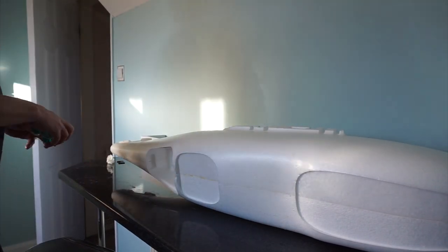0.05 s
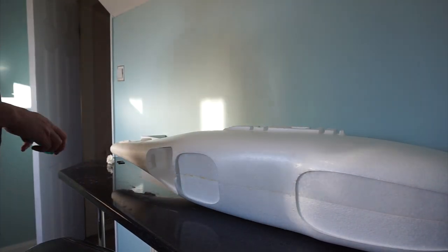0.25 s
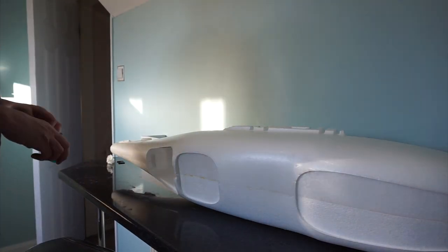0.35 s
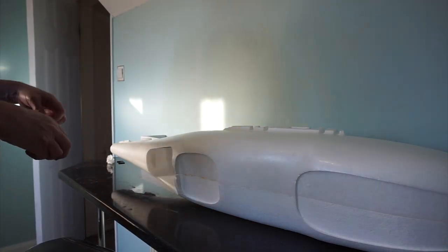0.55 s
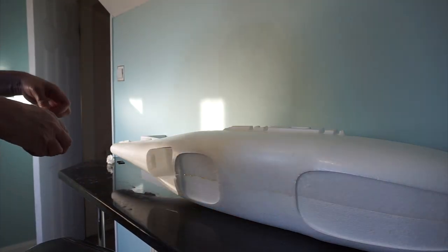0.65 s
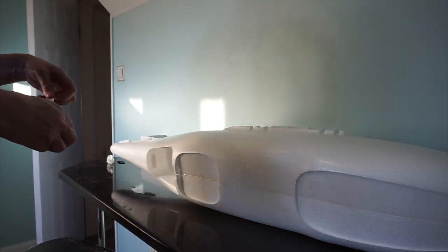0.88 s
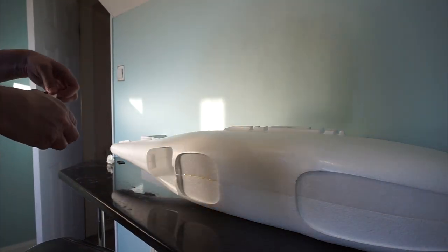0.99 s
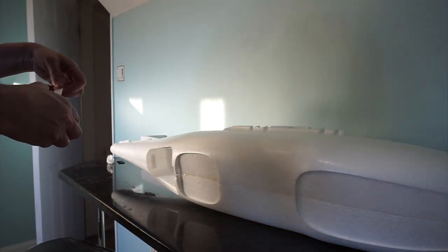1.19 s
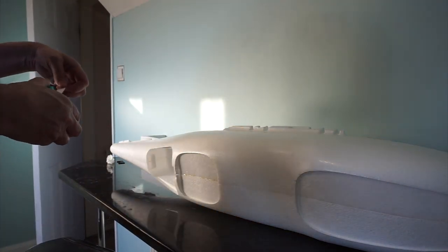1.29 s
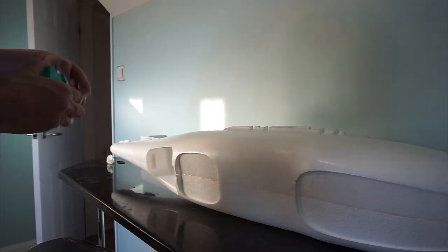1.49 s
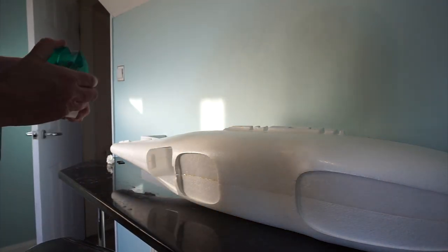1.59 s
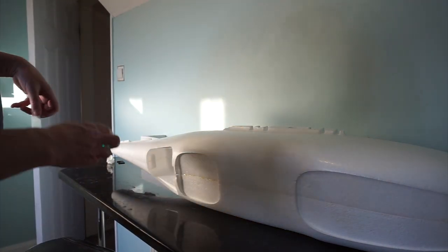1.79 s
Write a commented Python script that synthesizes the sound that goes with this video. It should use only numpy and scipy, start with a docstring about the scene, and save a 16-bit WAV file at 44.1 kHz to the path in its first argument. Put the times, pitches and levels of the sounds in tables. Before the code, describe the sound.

A long crackling rasp of sticky tape peeling from its roll, then a quick rip in an echoing room.

```python
"""Tape ripped off a roll

Adhesive tape is pulled off a roll, left of a small camera, in a bare echoing room: a long rasping pull and a
short rip made of dense random clicks, tacks of glue that are each a single placed click with a brief ring,
and soft rustles of noise. Filtered noise makes the low rumble and a wavering drone; filtered clicks make
the camera's ticking drive. The gain turns down when the tape is loud and creeps back up afterwards."""
import sys
import numpy as np
from scipy import signal
from scipy.fft import rfft, irfft, next_fast_len
from scipy.io import wavfile

SR = 44100
rng = np.random.default_rng(int(sys.argv[2]) if len(sys.argv) > 2 else 0)


def volts_from_db(level):
    """Convert decibel levels to linear amplitude ratios."""
    exponent = np.asarray(level, float) / 20
    return 10 ** exponent


def waveform_to_disk(signal):
    """Save audio, clipped to [-1, 1], as 16-bit WAV at the path in sys.argv[1]."""
    frames = np.transpose(np.atleast_2d(signal))
    scaled = np.clip(frames, -1, 1) * 32767
    samples = np.round(scaled).astype(np.int16)
    wavfile.write(sys.argv[1], SR, samples)


N = 81585  # length in samples

# Colour of the crackling glue, before any filters: pitch_hz [Hz], level_db [dB per Hz, relative]
GLUE_COLOUR = [(150, -66.5), (300, -30), (544, -18), (1100, -11.5), (2210, 0), (3190, -3), (4330, -3),
               (6000, -2), (8000, -6), (10000, -0.5), (12500, -10)]


def rms_one(x):
    """Scale to an average strength (rms) of 1."""
    return x / np.sqrt(np.mean(x ** 2) + 1e-20)


def at_hz(points, hz):
    """Read a table of values against pitch, on a log pitch axis."""
    table_hz, values = np.array(points).T
    return np.interp(np.log(hz), np.log(table_hz), values)


def smooth(x, seconds):
    """Even out quick changes with two equal one-pole low-passes."""
    r = np.exp(-1 / (seconds * SR))
    return signal.lfilter([(1 - r) ** 2], [1, -2 * r, r * r], x)


def drift(rate_hz):
    """Slow random wandering with spread 1; the first second lets the filter settle."""
    wander = smooth(rng.standard_normal(N + SR), 1 / (2 * np.pi * rate_hz))
    return rms_one(wander[SR:])


def butter(x, order, hz, kind="low"):
    """Butterworth filter that runs forward in time."""
    return signal.sosfilt(signal.butter(order, hz, kind, fs=SR, output="sos"), x)


def resonance(hz, width_hz):
    """One ringing filter, listed twice so that it is applied twice."""
    r = np.exp(-np.pi * width_hz / SR)
    row = [1, 0, -1, 1, -2 * r * np.cos(2 * np.pi * hz / SR), r * r]
    return [row, row]


def colour(x, spectrum):
    """Give a sound the wanted spectrum without any ringing ahead of it (minimum phase)."""
    hz = np.maximum(np.arange(1025) * SR / 2048, 10)
    log_gain = np.log(volts_from_db(at_hz(spectrum, hz).clip(-60)))
    # folding the cepstrum forward in time gives the minimum-phase filter
    cepstrum = irfft(log_gain) * np.r_[1, np.full(1023, 2), 1, np.zeros(1023)]
    return signal.fftconvolve(x, irfft(np.exp(rfft(cepstrum))))[:len(x)]


def bands(length, gain, likeness):
    """Third-octave bands of stereo noise; gain(hz) gives each its envelope, likeness its left-right match."""
    out = 0
    edges = 24 * 2 ** (np.arange(29) / 3)
    settle = SR // 5
    white = rng.standard_normal((2, 2, length + settle))  # two noise pairs, used in turn
    for k, (low, high) in enumerate(zip(edges, edges[1:])):
        mid, side = butter(white[k % 2], 2, [low, high], "band")[:, settle:]
        hz = np.sqrt(low * high)
        alike = np.clip(at_hz(likeness, hz), -1, 1)
        stereo = np.sqrt(1 + alike) * mid + np.sqrt(1 - alike) * side * [[1], [-1]]
        out = out + gain(hz) * stereo
    return out


def delayed(x, seconds):
    """Delay by turning the phase of each frequency, so fractions of a sample work too."""
    size = next_fast_len(N + SR // 10)
    hz = np.arange(size // 2 + 1) * SR / size
    return irfft(rfft(x, size) * np.exp(-2j * np.pi * hz * seconds), size)[:N]


def level_of(x, seconds):
    """Running level in dB."""
    return 10 * np.log10(smooth(np.mean(x ** 2, axis=0), seconds) + 1e-12)


def strip(slips, pitch_hz):
    """The free strip rings in one broad resonance whose pitch follows the tension."""
    out, state = np.zeros(N), np.zeros((2, 2))
    for i in range(0, N, 128):  # the pitch is renewed every 128 samples
        filters = resonance(pitch_hz[i], width_hz=780)
        out[i:i + 128], state = signal.sosfilt(filters, slips[i:i + 128], zi=state)
    return rms_one(out)


def pull(rows, glue):
    """Glue lets go in dense clumped slips that crackle and set the strip and roll ringing."""
    slips_per_s, slip_spread_db = 8000, 4.0
    clumps_per_s, clump_db = 150, 2.5
    body_hz = 1900
    t = np.arange(N) / SR
    start_s, *columns = np.array(rows).T
    level_db, strip_db, pitch_hz, body_db = [np.interp(t, start_s, column) for column in columns]
    chance_db = slip_spread_db * np.minimum(rng.exponential(1, N), 4)
    sizes = volts_from_db(chance_db + clump_db * drift(clumps_per_s))
    happens = rng.random(N) < slips_per_s / SR
    slips = sizes * rng.choice([-1, 1], N) * happens + 1e-18
    crackle = rms_one(colour(slips, glue))
    body = signal.sosfiltfilt(signal.butter(2, body_hz, fs=SR, output="sos"), crackle)
    # body_db sets how strongly the low part of the crackle is raised or lowered
    sound = crackle + (volts_from_db(body_db) - 1) * body + volts_from_db(strip_db) * strip(slips, pitch_hz)
    return sound * volts_from_db(level_db) * (t >= start_s[0]) * (t < start_s[-1])


def tacks():
    """Each tack is a sharp click in the colour of the glue with one brief ring."""
    # Tacks letting go, levels before filters and room:
    # start_s [s], level_db [dB], ring_hz [Hz], ring_db [dB, halved in strength when added]
    tack_rows = [(.2152, -4, 9800, -2), (.2322, -10, 3000, -3), (.24, -5, 3000, 7), (.2588, -6, 3000, 2),
                 (.2665, -4, 9800, -3), (.277, -4, 9800, -3), (.291, -4, 9800, -4), (1.1728, -24, 9800, 0),
                 (1.5138, -12, 10200, -8), (1.5322, 3, 5000, -8), (1.5375, 4, 10200, -4)]
    ring_s = .0025  # the ring falls by e three times in this time
    out, t = np.zeros(N + SR), np.arange(600) / SR
    crack = colour(1. * (t == 0), GLUE_COLOUR)
    crack = crack / np.abs(crack).max()
    for start_s, level_db, ring_hz, ring_db in tack_rows:
        ring = volts_from_db(ring_db) * np.sin(2 * np.pi * ring_hz * t) * np.exp(-t / ring_s * 3)
        first = int(start_s * SR)
        out[first:first + len(t)] += volts_from_db(level_db) * (crack + ring / 2)
    return butter(out[:N], 2, 1500, "high")


def rustles():
    """Fingers on the tape: fading bursts of glue-coloured noise, each with one band standing out."""
    # Soft rustles, levels before filters and room:
    # start_s [s], level_db [dB], fade_s [s], ring_hz [Hz], ring_db [dB]
    rustle_rows = [(.0755, -45, 0.015, 6800, -7.5), (.184, -53.5, 0.014, 2173, 4),
                   (1.1752, -45.5, .02, 4900, -10), (1.783, -39.5, 0.019, 9910, -3.5)]
    half_width = 0.17  # of the ringing band, as a share of its pitch
    out, t = 0, np.arange(N) / SR
    noise = rms_one(colour(rng.standard_normal(N), GLUE_COLOUR))
    for start_s, level_db, fade_s, ring_hz, ring_db in rustle_rows:
        edges = [ring_hz * (1 - half_width), ring_hz * (1 + half_width)]
        ring = rms_one(butter(noise, 2, edges, "band"))
        fade = np.exp(-np.maximum(t - start_s, 0) / fade_s) * (t >= start_s)
        out = out + volts_from_db(level_db) * (noise + volts_from_db(ring_db) * ring) * fade
    return out


def room(x):
    """Direct sound from the left, a strong wall echo, and a tail whose pattern shifts as the hands move."""
    # Time for the tail to fall by 60 dB: pitch_hz [Hz], fall_s [s]
    fall_times = [(300, 0.33), (1000, 0.63), (2000, 0.52), (4000, .55), (7000, .48), (11000, 0.31)]
    # How alike the two sides of the tail are: pitch_hz [Hz], likeness [-1 to 1]
    tail_likeness = [(300, .8), (800, 0.75), (2000, 0.24), (5000, -0.44), (11000, -0.1)]
    tail_db, tail_rise_s, tail_pan_db = 5.5, 0.014, 1
    hand_move_s = .07  # time to fade from one of the four tail patterns to the next
    direct_db, direct_pan_db, right_lag_s = -0.5, 6, .00006
    echo_s, echo_pan_db = .0053, 3
    t, out = np.arange(SR * 3 // 4) / SR, np.zeros((2, N))
    turn = np.arange(N) / SR / hand_move_s
    for place in range(4):
        tail = bands(len(t), lambda hz: volts_from_db(-60 * t / at_hz(fall_times, hz)), tail_likeness)
        tail = tail * (1 - np.exp(-t / tail_rise_s))
        tail = volts_from_db(tail_db) * tail / np.sqrt(np.sum(tail ** 2) / 2)
        tail = tail * volts_from_db([[tail_pan_db / 2], [-tail_pan_db / 2]])
        share = np.sqrt(np.clip(1 - np.abs((turn - place) % 4 - 1), 0, 1))
        out += signal.fftconvolve((x * share)[None], tail, axes=1)[:, :N]
    for channel, side in enumerate((1, -1)):  # left, then right
        out[channel] += volts_from_db(side * direct_pan_db / 2 + direct_db) * delayed(x, channel * right_lag_s)
        out[channel] += volts_from_db(side * echo_pan_db / 2) * delayed(x, echo_s)
    return out


def ticks():
    """Dull single clicks of the drive, carried through the camera body."""
    # Ticks before the gain control: start_s [s], level_db [dB, rough peak]
    tick_rows = [(.0235, -29), (0.0898, -30.5), (0.1225, -25), (.157, -28.5), (0.958, -31), (1.022, -32),
                 (1.158, -32), (1.224, -27)]
    low_hz, high_hz = 211, 850
    clicks = np.zeros(N) + 1e-18
    for start_s, level_db in tick_rows:
        clicks[int(start_s * SR)] = -volts_from_db(level_db) * SR / high_hz / 4
    return butter(clicks, 2, [low_hz, high_hz], "band")


def rumble():
    """Low room and camera noise with a faint hiss above, wavering slightly and most in the bass."""
    # Colour of the noise: pitch_hz [Hz], level_db [dB per Hz, relative]
    rumble_colour = [(25, -28), (60, -20), (110, -23.5), (200, -14), (350, -20), (560, -22.5),
                     (1000, -31.5), (2500, -34.5), (6000, -37), (12500, -35.5)]
    # How alike left and right are: pitch_hz [Hz], likeness [-1 to 1]
    rumble_likeness = [(40, .85), (150, .9), (300, .75), (800, .6), (2000, .2), (11000, .1)]
    level_db, waver_db = -45.5, -0.5
    waver = drift(11)

    def gain(hz):
        return volts_from_db(at_hz(rumble_colour, hz) + waver_db * waver * min(1, 400 / hz))

    return volts_from_db(level_db) * rms_one(bands(N, gain, rumble_likeness))


def drone():
    """A wavering low drone: noise through two narrow resonances, each applied twice."""
    # Resonances: pitch_hz [Hz], width_hz [Hz, of each pass], level_db [dB, before the swell]
    drone_rows = [(147.5, 35, -46.5), (273, 28, -55.5)]
    # Swell of the drone: start_s [s], level_db [dB, added]
    swell_rows = [(0, -2), (.12, -1.5), (.3, 0.5), (.6, 6.5), (0.751, -4), (.9, 7), (1.06, -6), (1.15, 9),
                  (1.21, 1.5), (1.33, 6), (1.42, 1.5), (1.5, -3), (1.62, -0.5), (1.7, 1.5), (1.85, 1.5)]
    side_db = -12.5  # left-right difference against the shared part
    out = 0
    swell = volts_from_db(np.interp(np.arange(N) / SR, *np.transpose(swell_rows)))
    for pitch_hz, width_hz, level_db in drone_rows:
        noise = rng.standard_normal((2, N + SR))
        mid, side = rms_one(signal.sosfilt(resonance(pitch_hz, width_hz), noise)[:, SR:])
        out = out + volts_from_db(level_db) * (mid + volts_from_db(side_db) * side * np.array([[1], [-1]]))
    return out * swell


def scene():
    """Tape in the room over the low noises and the camera's ticks."""
    # Course of each pull, levels before filters and room: start_s [s], level_db [dB],
    # strip_db [dB, ringing strip], pitch_hz [Hz, strip], body_db [dB, change of the lows]
    long_pull = [(.2152, -30, -3.5, 3040, -12.5), (.232, -26, -5, 3350, -12.5),
                 (.246, -16.5, -6, 3010, -11), (.26, -28.5, -4.5, 2950, -11.5),
                 (.278, -18, -23.5, 2920, -4), (.3, -11, -16.5, 3330, 1), (.335, -16, -1, 3514, -10.5),
                 (.38, -8, -2, 3330, -3.5), (.42, -8, -10, 3390, -1.5), (.46, -6, -19, 3400, 1),
                 (.5, -8.5, -29, 3100, 3.5), (.525, -18, -20, 3070, -6)]
    short_pull = [(1.514, -13.5, -17, 4040, -9), (1.5305, -38, -8, 3950, -3), (1.5325, -8, -15, 3816, 3.5),
                  (1.545, -15.5, -6.5, 4146, 14.5), (1.556, -23.5, -3.5, 4100, -29),
                  (1.62, -26.5, -4.5, 3840, 17.5), (1.66, -70, -23, 4000, -2)]
    # Colour of the short rip's crackle: pitch_hz [Hz], level_db [dB per Hz, relative]
    short_colour = [(150, -57.5), (300, -19.5), (450, -13), (680, -23.5), (950, -14), (1500, -15),
                    (2300, -6), (3190, -5.5), (4330, 1), (6000, 2), (8000, -2.5), (10000, 5.5), (12500, -1)]
    tape = pull(long_pull, GLUE_COLOUR) + pull(short_pull, short_colour) + tacks() + rustles()
    tape = butter(tape, 4, 209, "high")
    return room(tape) + rumble() + drone() + ticks()


def automatic_gain(x):
    """Loud sound turns the gain down quickly; it then creeps back up."""
    knee_db, share = -22.5, 0.62  # dB of cut per dB above the knee
    level_s, attack_s, release_db_per_s = 0.0067, 0.031, 1
    climb = release_db_per_s * np.arange(N) / SR
    cut_db = share * np.maximum(level_of(x, level_s) - knee_db, 0)
    held_db = np.maximum.accumulate(cut_db + climb) - climb  # the largest cut so far, slowly let go
    return x * volts_from_db(-smooth(held_db, attack_s))


def overload(x):
    """The input bends above half its limit and flattens towards the limit."""
    limit = .7
    bent = np.sign(x) * limit / 2 * (1 + np.tanh(2 * np.abs(x) / limit - 1))
    return np.where(np.abs(x) < limit / 2, x, bent)


def thin_bass(x):
    """The bass thins out while the sound is loud."""
    knee_db, share = -16.5, 6  # dB of cut per dB above the knee
    edge_hz, level_s = 280, .004
    bass = signal.sosfiltfilt(signal.butter(2, edge_hz, fs=SR, output="sos"), x)
    cut_db = share * np.maximum(level_of(x, level_s) - knee_db, 0)
    return x + bass * (volts_from_db(-cut_db) - 1)


def band_limit(x):
    """A steep low-pass at the top of the band."""
    return signal.sosfilt(signal.butter(12, 12320, fs=SR, output="sos"), x)


def record(dry):
    """Gain control, overload and a bass that thins out while the sound is loud, then a steep top cut."""
    x = thin_bass(overload(automatic_gain(dry)))
    top_cut = signal.cheby2(24, 80, 11450, fs=SR, output="sos")  # 80 dB down from 11450 Hz up
    mix = signal.sosfilt(top_cut, x)
    return band_limit(mix)


dry = scene()
out = record(dry)
waveform_to_disk(out)
```